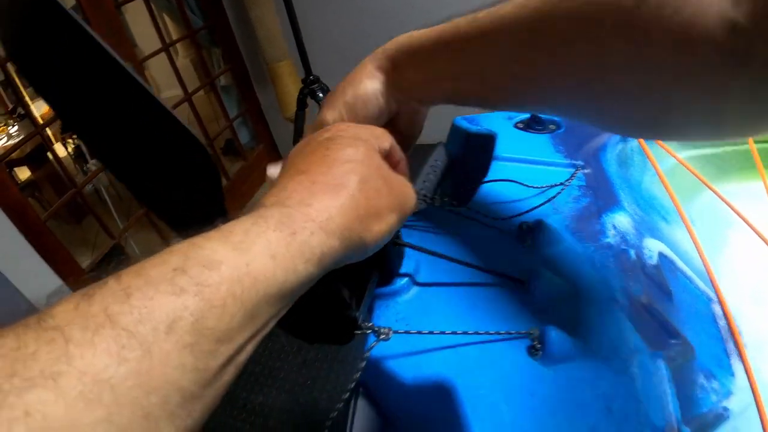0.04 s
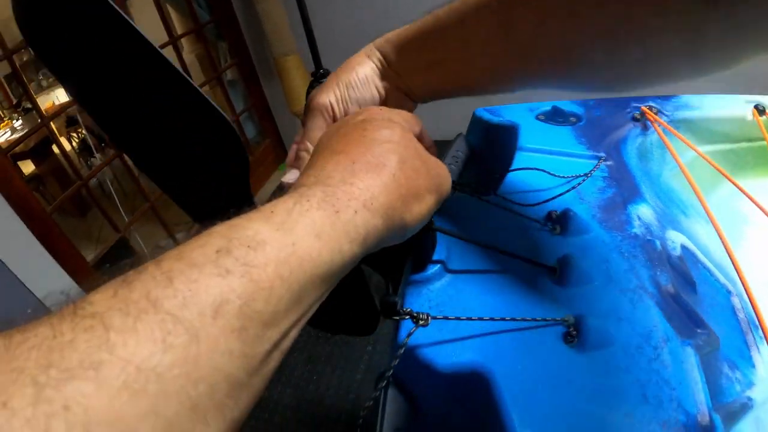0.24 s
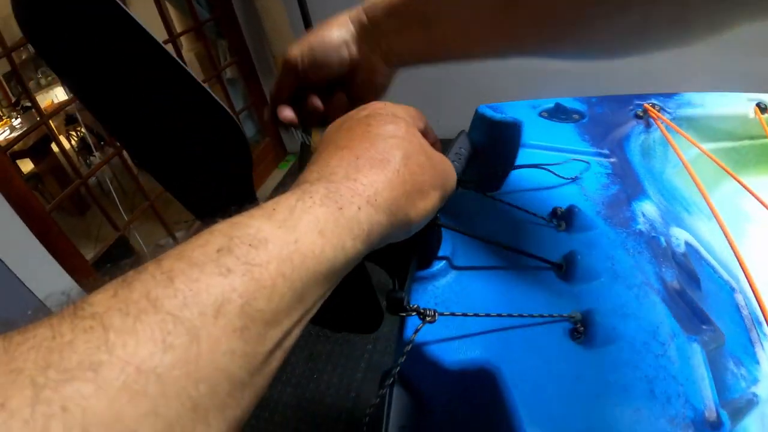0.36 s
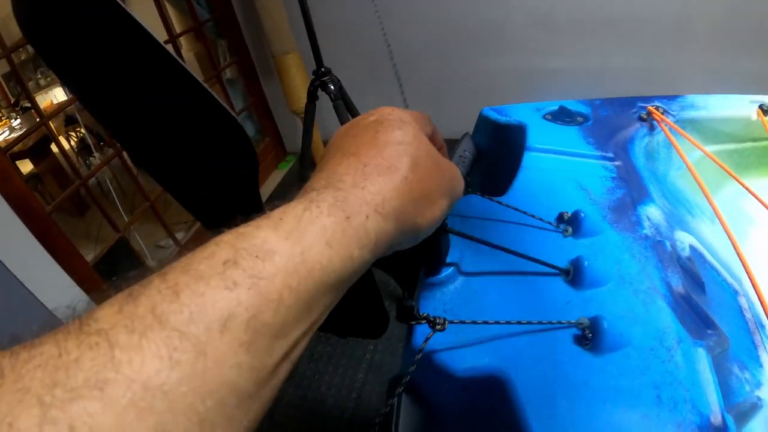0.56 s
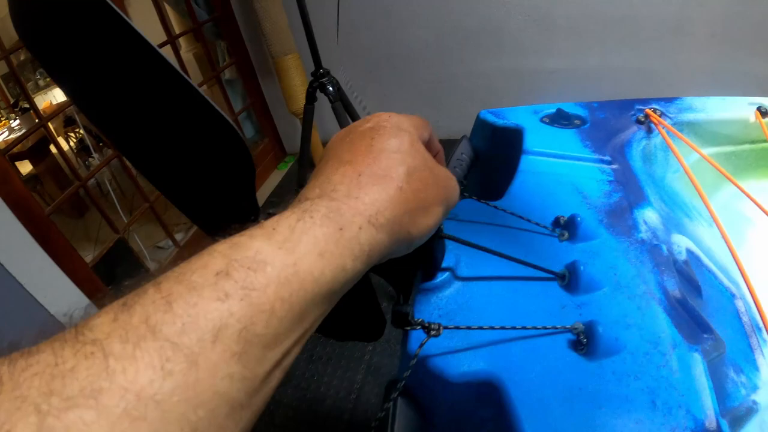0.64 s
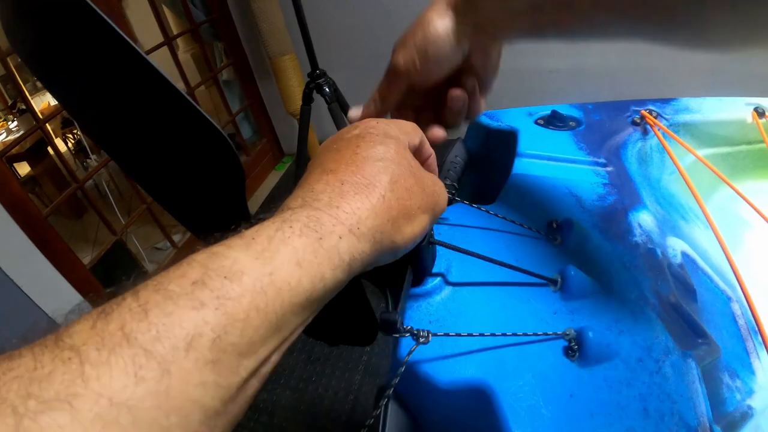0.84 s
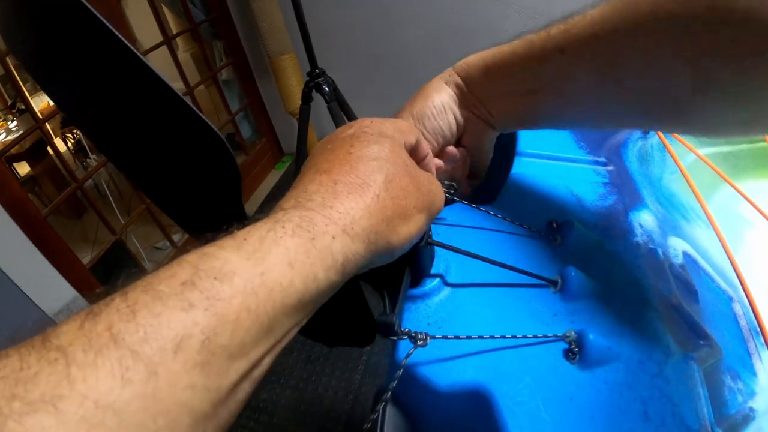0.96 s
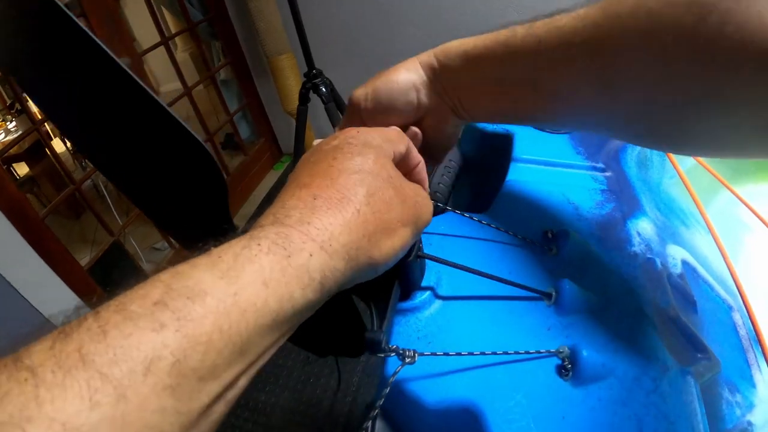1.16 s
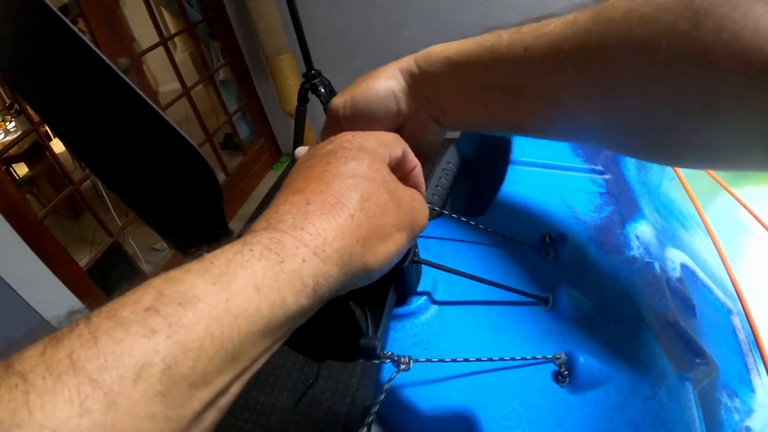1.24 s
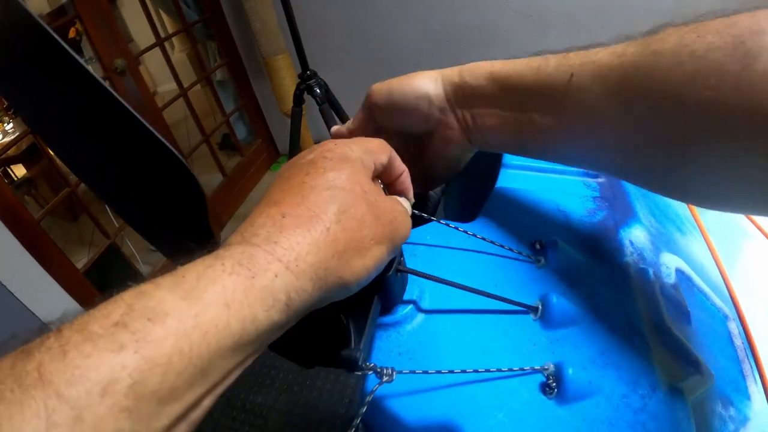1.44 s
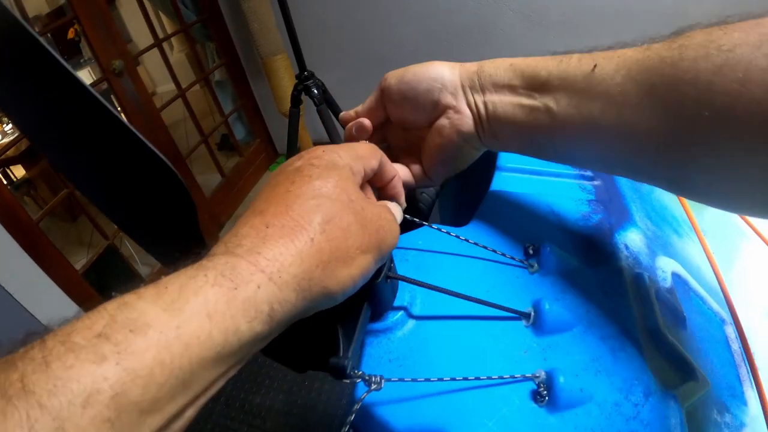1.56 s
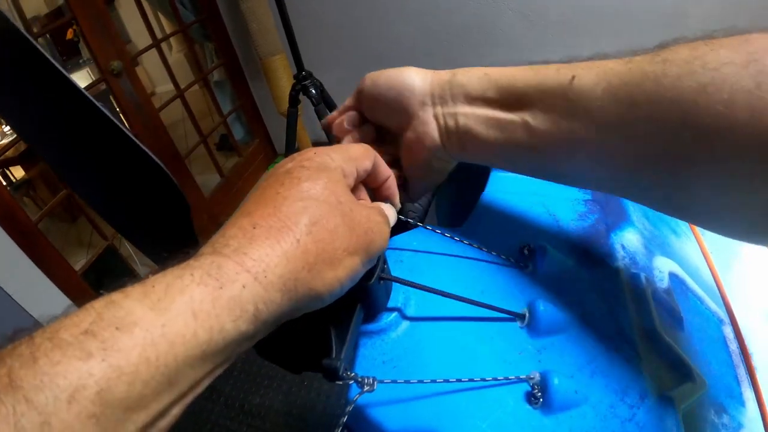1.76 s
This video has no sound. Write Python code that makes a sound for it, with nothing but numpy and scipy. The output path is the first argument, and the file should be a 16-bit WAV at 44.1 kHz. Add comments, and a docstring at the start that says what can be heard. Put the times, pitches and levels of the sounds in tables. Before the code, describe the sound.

Braided cord pulled through a plastic handle buzzes briefly, then hands knock a hollow plastic boat.

```python
"""A braided cord zips through a plastic handle on a hollow plastic boat, close up in a small room.
A hand bumps the hull, grabs the cord and pulls: the ribs of the braid buzz over the rim of the hole,
rising and falling with its speed, until it snaps taut and creeps with a thin squeak. The handle knocks
on the hull, a short second pull tightens the cord, and fingers shift their grip.
Arm movements shake the microphone, adding a low rumble over quiet room tone."""
import sys
import numpy as np
from scipy import signal
from scipy.fft import rfft, irfft
from scipy.io import wavfile
from scipy.ndimage import map_coordinates

SR = 44100
rng = np.random.default_rng(int(sys.argv[2]) if len(sys.argv) > 2 else 0)


def generate_wav(signal):
    """Clip the signal to [-1, 1] and save it as 16-bit WAV at the path in sys.argv[1]."""
    frames = np.transpose(np.atleast_2d(signal))
    scaled = np.clip(frames, -1, 1) * 32767
    pcm = np.round(scaled).astype(np.int16)
    wavfile.write(sys.argv[1], SR, pcm)


N = 79380

# room tone (frequency [Hz], gain [dB])
ROOM_TONE_EQ = [(25, 1.5), (60, -17.5), (110, -18), (155, 7), (330, 2), (600, -11.5), (2600, -24),
                (4700, -25), (15000, -49.5)]
# microphone shakes, skin rubs, grabbing swipes (peak time [s], rise [s], t60 [s], level [dB])
ARM_SHAKES = [(.02, .03, 0.091, -55.5), (.25, 0.04, 0.42, -41.5), (.345, 0.11, 0.11, -51.5),
              (.62, 0.018, 1, -59.5), (1.07, 0.037, 0.19, -38.5), (1.28, 0.085, 0.4, -52)]
SKIN_RUBS = [(.214, 0.013, 0.097, -49.5), (1.01, 0.021, 0.25, -50), (1.145, 0.045, 0.16, -56),
             (1.215, 0.053, 0.23, -56), (1.46, 0.035, 0.053, -63.5), (1.535, 0.046, 0.24, -65.5),
             (1.76, .05, 0.37, -67)]
GRAB_SWIPES = [(.266, 0.0067, 0.018, -42), (.2745, 0.0042, 0.049, -33), (.292, 0.0062, 0.95, -55)]
# the tone of each of those moves (frequency [Hz], gain [dB])
SHAKE_EQ = [(25, 2), (90, 13.5), (130, -11.5), (300, -58.5)]
RUB_EQ = [(700, -0.5), (1400, 5.5), (2200, -3.5), (5600, -0.5), (7500, -13.5), (11000, -23), (15000, -39)]
SWIPE_EQ = [(1300, -7.5), (2000, -8.5), (2800, 3.5), (3800, -2.5), (5000, -2), (9000, -9), (15000, -37)]
# modes of the hollow hull (frequency [Hz], level [dB], t60 [s])
HULL_MODES = [(91.9, -2.5, 0.41), (140.3, -0.5, 0.6), (204.9, -2, 0.77), (253, -3, 0.22), (359.8, 3, 0.13),
              (497, -2, 0.22), (704, -2.5, 0.11), (774, -8.5, 0.1), (1050, -10, 0.26), (1318, -12.5, 0.28),
              (1550, -13.5, 0.13)]
# blows on the hull (time [s], strength [dB], nominal contact [ms], click level [dB])
HULL_KNOCKS = [(.199, -49.5, 1.56, -72), (.216, -48, 0.74, -64), (.243, -48.5, 1.25, -68),
               (.268, -52.5, 2.2, -54), (0.992, -37.5, 0.26, -30), (1.001, -47, 0.35, -52),
               (1.02, -49.5, 2.2, -53), (1.066, -42.5, 1.8, -48), (1.193, -52, 0.65, -59),
               (1.228, -50, 1.18, -60), (1.528, -64, 0.92, -56.5), (1.733, -65, 0.92, -71)]
# a blow's dull body and bright attack (frequency [Hz], gain [dB])
THUD_EQ = [(30, -9), (100, -5.5), (170, -0.5), (480, 0), (950, -3.5), (1400, -18), (15000, -60)]
CLICK_EQ = [(300, 4.5), (2500, 8.5), (4000, 2), (5200, 8), (11000, -17), (15000, -47)]
# the cord's two runs through the handle (time [s], rib rate [Hz], drive [dB])
LONG_PULL = [(.39, 200.2, -53), (.412, 368, -50), (.443, 900, -48.5), (.455, 1261, -41), (.48, 1540, -42),
             (.508, 1850, -44.5), (.545, 1880, -34.5), (.572, 2020, -35), (.615, 1721, -34.5),
             (.63, 1133, -35), (.652, 739, -39), (.678, 291.7, -43), (.715, 199.6, -53.5), (.76, 119, -57)]
SHORT_PULL = [(1.17, 660, -58), (1.194, 743.7, -45.5), (1.225, 723.4, -48), (1.255, 350, -53.5),
              (1.34, 197.3, -66)]
# what the handle radiates (frequency [Hz], gain [dB])
HANDLE_EQ = [(110, -12), (220, -2.5), (1850, -1.5), (2150, -10.5), (2520, -6), (2900, 5), (3400, -5),
             (3620, -0.5), (3900, -6.5), (4400, 2.5), (5800, -3.5), (6600, -12.5), (15000, -24)]
# dry tick of the cord snapping taut (frequency [Hz], gain [dB])
TICK_EQ = [(500, -9), (1450, 5), (2400, -3.5), (3300, 0.5), (3900, -8.5), (5500, -10.5), (6200, -1),
           (7000, -5), (7600, -12), (15000, -28)]
# squeaks of the taut cord (peak time [s], swell [s], pitch [Hz], level [dB])
CORD_SQUEAKS = [(.868, 0.046, 4700, -65.5), (1.34, 0.07, 5420, -71.5)]
# balance of the microphone ports (frequency [Hz], left over right [dB])
PORT_BALANCE = [(60, 4), (1300, 1), (3500, 3.5), (8000, -0.5), (15000, -2)]

GRAIN_DB, GRAINS_PER_S, SLIPS_PER_S = 3, 900, 160
ROOM_T60_S, ROOM_TREBLE_T60_S, PREDELAY_S = 0.47, 0.29, .004


def undb(db):
    return 10 ** (np.asarray(db) / 20)


def clock():
    return np.arange(N) / SR


def unit(x):
    return x / np.sqrt(np.mean(x ** 2) + 1e-20)


def noise():
    return rng.standard_normal(N)


def through(x, response):
    return signal.fftconvolve(x, response)[:N]


def butter(x, hz, kind, order=2):
    return signal.sosfilt(signal.butter(order, hz, kind, fs=SR, output="sos"), x)


def colour(x, points):
    """Minimum-phase EQ through (frequency [Hz], gain [dB]) points."""
    hz, db = np.array(points, float).T
    bins_hz = np.maximum(np.arange(N + 1) * SR / (2 * N), 1)
    gain = undb(np.interp(np.log(bins_hz), np.log(np.sort(hz)), db))
    cepstrum = irfft(np.log(gain))
    cepstrum[1:N] *= 2
    cepstrum[N + 1:] = 0
    return irfft(rfft(x, 2 * N) * np.exp(rfft(cepstrum)))[:N]


def walk(rate):
    """Random modulator with RMS 1, gliding to `rate` new values a second."""
    return unit(np.interp(clock() * rate, np.arange(N), noise()))


def fade(start, t60):
    """Exponential decay from a start time."""
    age = clock() - start
    return (age >= 0) * np.exp(-np.log(1000) * np.maximum(age, 0) / t60)


def ring(start, hz, t60):
    """One struck mode."""
    return fade(start, t60) * np.sin(2 * np.pi * hz * (clock() - start))


def grit():
    """Friction noise, uneven from fibre to fibre."""
    return unit(noise() * undb(GRAIN_DB * walk(GRAINS_PER_S)))


def diffuse():
    """Stereo noise, centred in the bass and wide in the treble."""
    side = butter(noise(), 1050, "high", order=1)
    mid = noise()
    return np.array([mid + side, mid - side]) / np.sqrt(2)


def in_room(x, wet_db):
    """Direct sound plus a short tail with little bass, whose treble dies first."""
    wash = butter(diffuse(), 176, "high")
    low = butter(wash, 2200, "low")
    tail = low * fade(PREDELAY_S, ROOM_T60_S) + (wash - low) * fade(PREDELAY_S, ROOM_TREBLE_T60_S)
    return x + undb(wet_db) * np.array([through(x, side) for side in unit(tail) / np.sqrt(N)])


def room_tone(level_db=-59):
    """A quiet, faintly wavering bed of air."""
    level = undb(level_db + 0.28 * walk(24))
    return level * unit(np.array([colour(side, ROOM_TONE_EQ) for side in diffuse()]))


def strokes(rows, eq):
    """Friction that swells to a peak and dies away, once for each row."""
    t = clock()
    envelope = 0
    for peak, rise, t60, db in rows:
        swell = np.exp(-((t - peak) / rise) ** 2)
        envelope += undb(db) * np.where(t < peak, swell, fade(peak, t60))
    return envelope * unit(colour(grit(), eq))


def handling():
    """Skin rubs and swipes over the cord while the arm shakes the microphone."""
    rubs = in_room(strokes(SKIN_RUBS, RUB_EQ), wet_db=-0.5)
    swipes = in_room(strokes(GRAB_SWIPES, SWIPE_EQ), wet_db=-6.5)
    return rubs + swipes + strokes(ARM_SHAKES, SHAKE_EQ)


def hull_ring():
    """The ring of the hull after a sharp push."""
    return sum(undb(db) * ring(0, hz, t60) for hz, db, t60 in HULL_MODES)


def burst(start, eq, t60, push=(1.,)):
    """A crack of noise, coloured by the part that is struck and softened by the push."""
    source = noise()
    tone = lambda x: colour(through(x, np.array(push)), eq)
    return tone(source * fade(start, t60)) / np.std(tone(source))


def hull_knocks(thud_boost_db=7.5):
    """Each blow clicks, thuds and rings the hull; a longer contact is duller."""
    t, hull = clock(), hull_ring()
    out = 0
    for start, db, contact_ms, click_db in HULL_KNOCKS:
        push = t * fade(0, contact_ms / 1000 * np.pi)
        push /= push.sum()
        thud = undb(thud_boost_db) * burst(start, THUD_EQ, t60=0.23, push=push)
        ringing = np.interp(t - start, t, through(push, hull), left=0)
        click = burst(start, CLICK_EQ, t60=0.022)
        out += undb(db) * (thud + ringing) + undb(click_db) * click
    return out


def cord_pull(curve, hull_db, scatter_db=5, scrape_db=-2.5, drag_db=-10.5):
    """Uneven ribs bump over the rim of the hole as the cord catches and slips; the hull rings along."""
    times, hz, db = np.array(curve, float).T
    rib_hz = np.interp(clock(), times, hz)
    drive = undb(np.interp(clock(), times, db, left=-120, right=-120))
    jitter = .075 * walk(600)
    slip = .035 * walk(SLIPS_PER_S)
    phase = 2 * np.pi * np.cumsum(rib_hz * (1 + jitter + slip)) / SR
    overtones = sum(undb(-7.5 - 5.5 * k) * np.sin((k + 2) * phase) for k in range(8))
    flutter = undb(scatter_db * np.tanh(walk(SLIPS_PER_S)))
    buzz = unit((np.sin(phase) + overtones) * flutter)
    # the fibres scrape harder with speed and pulse with each rib
    scrape = undb(scrape_db) * (rib_hz / 1893) ** 0.73 * grit()
    scrape *= 1 + 0.73 * np.cos(phase)
    drag = undb(drag_db) * unit(butter(grit(), 1500, "low"))
    handle = colour(drive * (buzz + scrape + drag), HANDLE_EQ)
    body = through(np.gradient(handle), hull_ring())
    return handle + np.std(handle) * undb(hull_db) * unit(body)


def cord_snap(start=.7686, rebound_s=.00122, pop_hz=780):
    """The cord snaps taut: a tick and its instant rebound sound hollow, over a pop and a damped twang."""
    steps = 1. * (clock() >= start) + undb(-5) * (clock() >= start + rebound_s)
    tick = colour(np.diff(steps, prepend=0), TICK_EQ)
    tick = undb(-21) * tick / np.abs(tick).max()
    pop = -undb(-15) * ring(start, pop_hz, t60=0.0059)
    twang = undb(-20) * ring(start + 1 / (2 * pop_hz), hz=275.6, t60=0.04)
    body = butter(twang + pop, 2 * pop_hz, "low")
    panned = np.array([undb(-30) * body, body])  # close to the right port
    return in_room(tick, wet_db=-16.5) + panned


def cord_squeaks(waver=.016):
    """The taut cord creeps in the hole with thin, unsteady squeaks."""
    out = 0
    for peak, swell, hz, db in CORD_SQUEAKS:
        phase = 2 * np.pi * np.cumsum(hz * (1 + waver * walk(GRAINS_PER_S))) / SR
        envelope = np.exp(-((clock() - peak) / swell) ** 2)
        out += undb(db + GRAIN_DB * walk(SLIPS_PER_S)) * envelope * np.sin(phase)
    return out


def scene():
    """Cord, hands and hull in the room."""
    pulls = cord_pull(LONG_PULL, hull_db=-12.5) + cord_pull(SHORT_PULL, hull_db=-7)
    cord = in_room(pulls + cord_squeaks(), wet_db=-4.5)
    hands = handling()
    knocks = in_room(hull_knocks(), wet_db=-3.5)
    return cord + hands + knocks + cord_snap() + room_tone()


def record(dry, lag_s=3.3e-5, top_hz=15200):
    """Two ports: the left is slightly later and, below the high treble, louder; the top is cut."""
    delayed = map_coordinates(dry[0], [(clock() - lag_s) * SR])
    left = colour(delayed, [(hz, db / 2) for hz, db in PORT_BALANCE])
    right = colour(dry[1], [(hz, -db / 2) for hz, db in PORT_BALANCE])
    high_cut = signal.ellip(8, .2, 70, top_hz, fs=SR, output="sos")
    return signal.sosfilt(high_cut, np.array([left, right]))


dry = scene()
out = record(dry)
generate_wav(out)
```